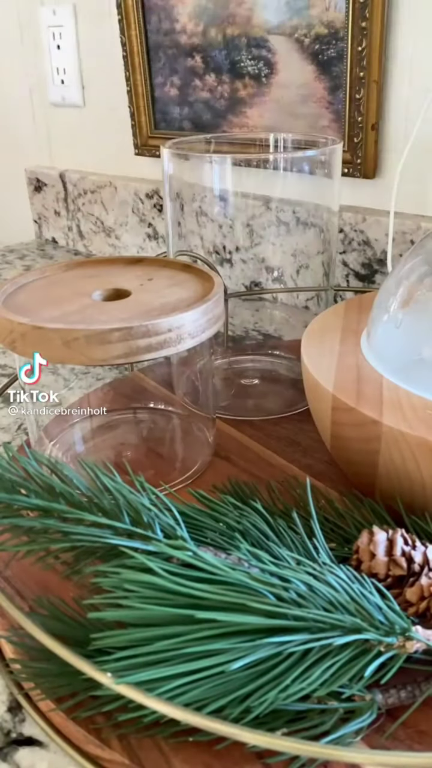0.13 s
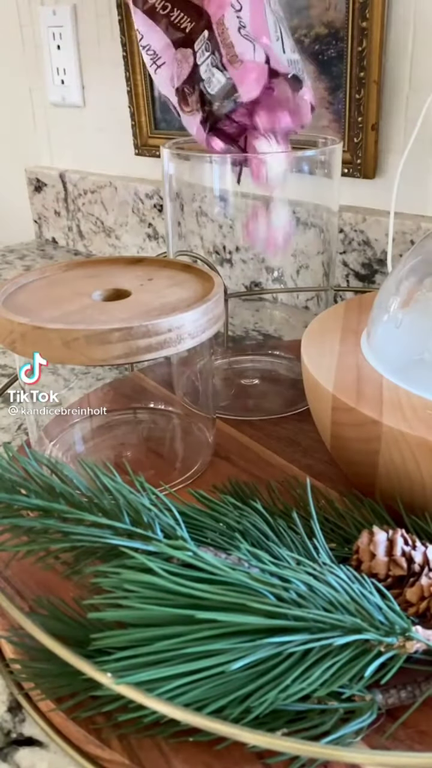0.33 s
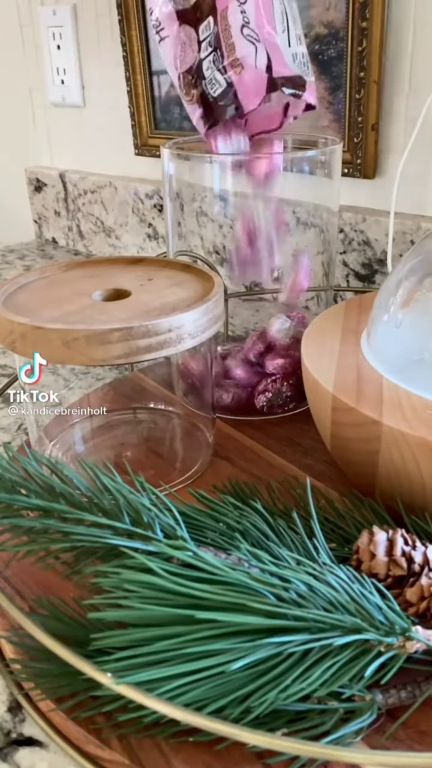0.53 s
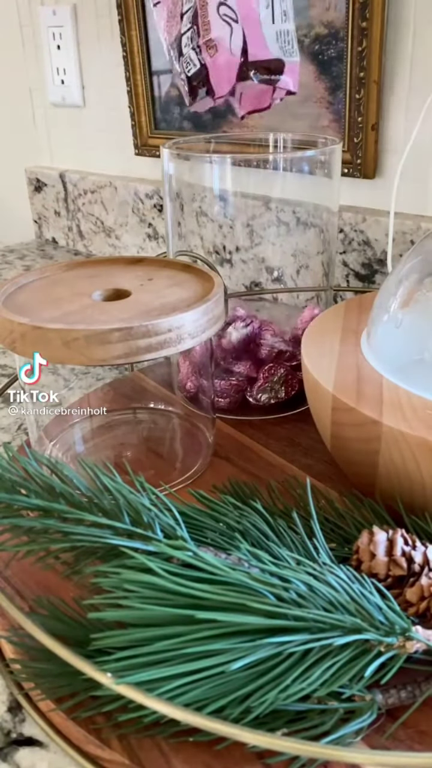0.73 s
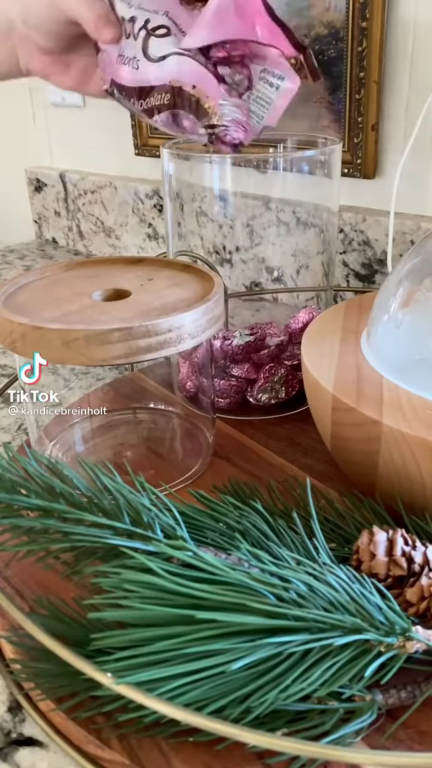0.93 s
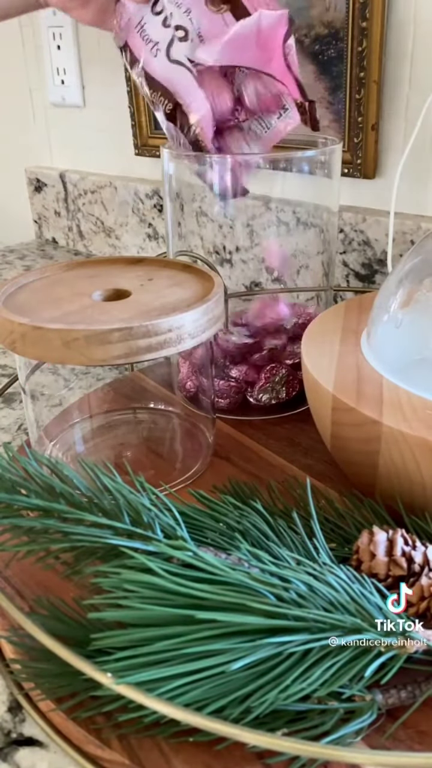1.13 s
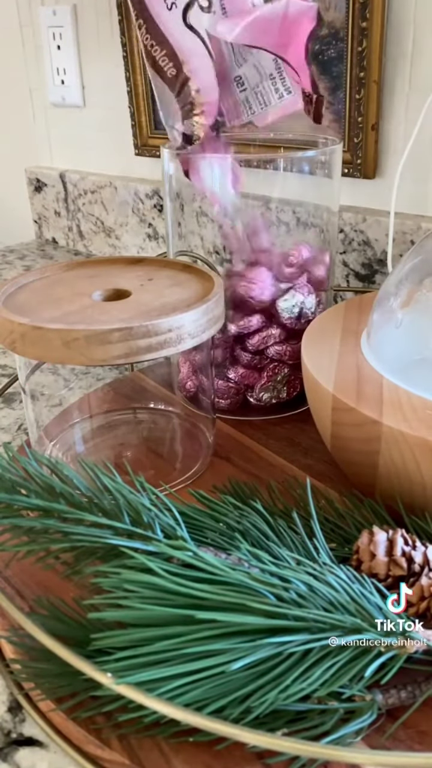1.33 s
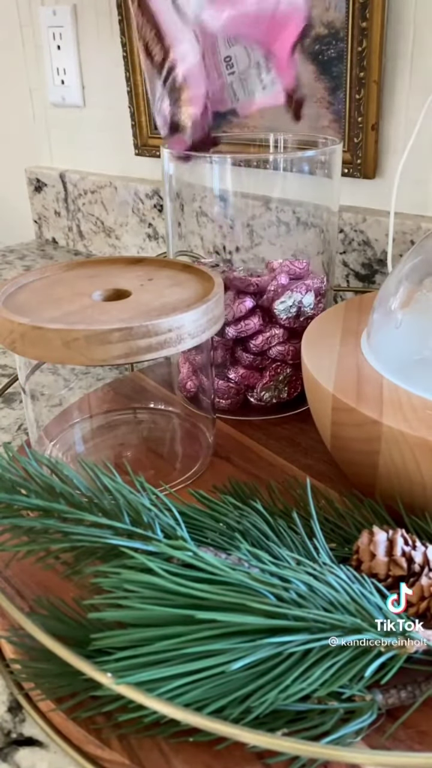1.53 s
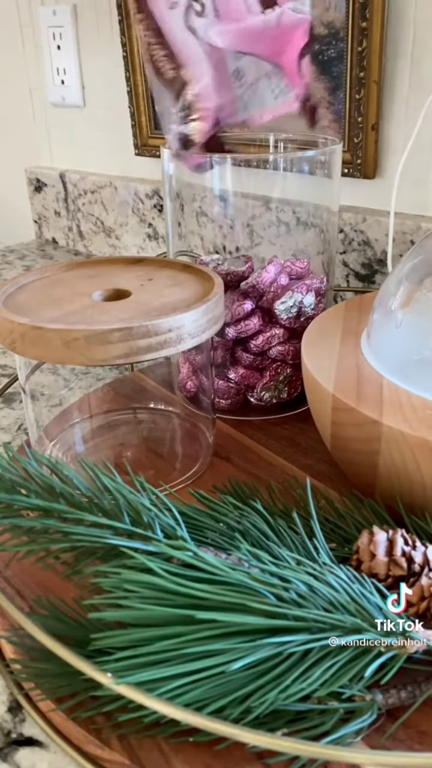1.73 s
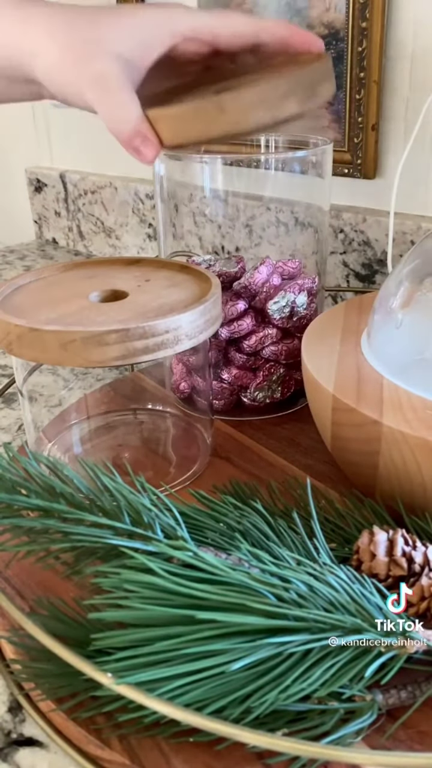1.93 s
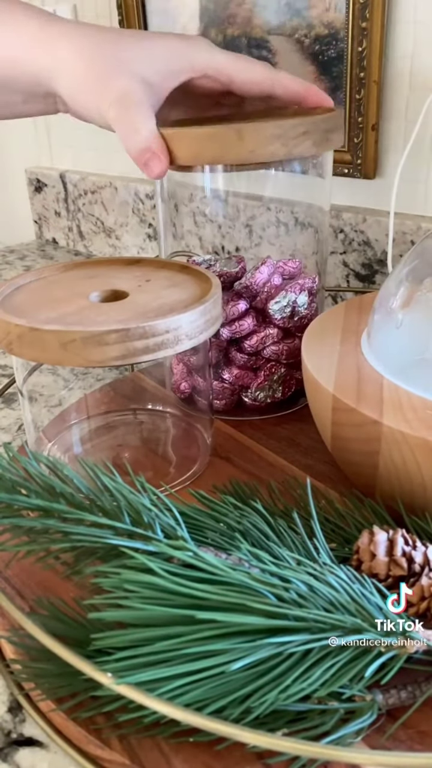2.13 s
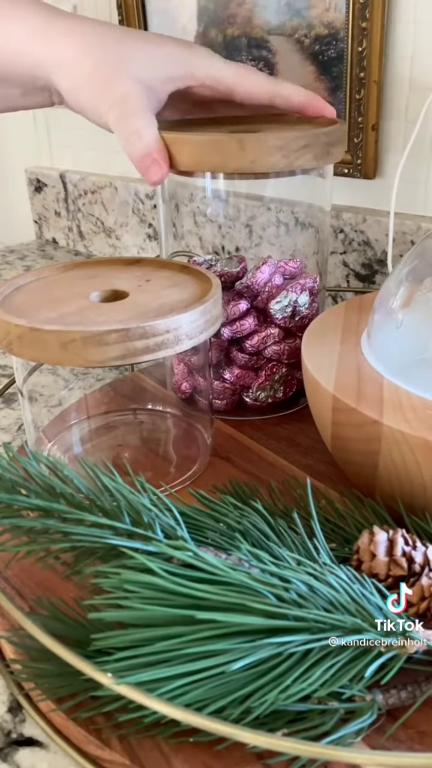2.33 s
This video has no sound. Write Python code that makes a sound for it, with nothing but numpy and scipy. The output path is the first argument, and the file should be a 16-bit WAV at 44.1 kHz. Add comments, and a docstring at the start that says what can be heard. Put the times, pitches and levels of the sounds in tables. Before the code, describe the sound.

Foil-wrapped chocolates pour from a crackling bag into a ringing glass jar, then a wooden lid knocks on

```python
"""Sweets poured into a glass jar

Foil-wrapped sweets are poured from a crackling bag into a thin glass jar in two shots, then a wooden lid is set on.
Each sweet that strikes the glass rings its modes and damps what was ringing; the heap rattles and thuds in the
jar's air. Grains of noise make the film, damped sines the lid; under all lies a quiet room with rumble and a
mains hum. The shots are joined by hard edits that cut the ringing glass."""
import sys
import numpy as np
from scipy import signal
from scipy.fft import rfft, irfft
from scipy.io import wavfile
from scipy.ndimage import uniform_filter1d

SR = 44100
rng = np.random.default_rng(int(sys.argv[2]) if len(sys.argv) > 2 else 0)


def makeup_ratio(level_db):
    """Linear amplitude ratio for a level in decibels (20 dB per factor of ten)."""
    decades = np.asarray(level_db, float) / 20
    return 10 ** decades


def file_out(sig):
    """Save sig as 16-bit WAV at sys.argv[1]."""
    # one column per channel
    cols = np.atleast_2d(sig).T
    # limit, then scale
    lim = np.clip(cols, -1, 1)
    pcm = np.round(lim * 32767).astype(np.int16)
    wavfile.write(sys.argv[1], SR, pcm)


N = 109544
T = np.arange(N) / SR

# the two shots of pouring: start/s, end/s
POURS = [(.135, .868), (.868, 1.755)]
# rattle of the tumbling heap: t/s, level/dB
TUMBLE = [(.27, -85), (.34, -28.5), (.55, -26), (.7, -34.5), (.77, -55), (1.12, -41.5), (1.25, -24.5),
          (1.35, -43.5), (1.42, -47.5), (1.6, -88)]


def read(points, hz):
    """Spectrum lookup on a log frequency axis."""
    f, value = np.transpose(points)
    return np.interp(np.log(hz + 1), np.log(f + 1), value)


def curve(table, column=1):
    """A column of a time table, per sample."""
    rows = np.array(table)
    return np.interp(T, rows[:, 0], rows[:, column])


def evened(x):
    """Scales to rms 1."""
    return x / np.sqrt(np.mean(x ** 2) + 1e-20)


def coloured(x, points):
    """Filters by a spectrum table."""
    gain = makeup_ratio(read(points, np.fft.rfftfreq(len(x), 1 / SR)))
    return irfft(rfft(x) * gain, len(x))


def band(x, lo_hz, hi_hz):
    """Band-pass."""
    sos = signal.butter(2, [lo_hz, min(hi_hz, SR / 2.1)], "band", fs=SR, output="sos")
    return signal.sosfilt(sos, x)


def clicks(per_s, spread_db):
    """Sparse clicks of random sign, a few large."""
    size = makeup_ratio(spread_db * np.minimum(rng.exponential(1, N), 4))
    sign = rng.choice([-1., 1.], N)
    return size * sign * (rng.random(N) < per_s / SR)


def burst(t60):
    """A short dying puff of noise."""
    t = np.arange(2000) / SR
    return rng.standard_normal(len(t)) * makeup_ratio(-60 * t / t60)


def add(mix, s, sound):
    """Mixes a sound in at a time."""
    part = mix[round(s * SR):][:len(sound)]
    part += sound[:len(part)]


def tumbling():
    """Gain of the tumbling heap, silent outside its table."""
    return makeup_ratio(curve(TUMBLE)) * (T > TUMBLE[0][0]) * (T < TUMBLE[-1][0])


def air():
    """Room rumble and hiss from coloured noise, with a slightly wavering mains hum."""
    # colour of the room noise: f/Hz, level/dB
    room_colour = [(15, -1.5), (44, -7.5), (86, -22), (121, -13.5), (153, -22.5), (735, -36.5),
                   (15500, -65)]
    room_db, hum_db, hum_hz = -37.5, -50.5, 120
    room = makeup_ratio(room_db) * evened(coloured(rng.standard_normal(N), room_colour))
    waver = 1 + 0.32 * evened(uniform_filter1d(rng.standard_normal(N), 3000))
    return room + makeup_ratio(hum_db) * waver * np.sin(2 * np.pi * hum_hz * T)


def bag():
    """Crackling film: clumped grains of varied colour over a hiss, and some distinct snaps."""
    # crackle of bag and foil: t/s, level/dB
    crackle = [(.135, -29), (.36, -23.5), (.55, -29.5), (.69, -31.5), (.77, -59), (.81, -42.5), (.97, -35),
               (1.08, -29.5), (1.27, -28.5), (1.4, -34.5), (1.6, -45.5), (1.64, -40), (1.755, -49.5)]
    # tone of the crackle, before a 3 dB per octave upward tilt: f/Hz, level/dB
    film_colour = [(88, -36), (150, -9.5), (500, 2), (1340, -7), (4500, -9.5), (15500, -15)]
    # single snaps of the film: t/s, level/dB, f/Hz
    snaps = [ (0.8086, -23.5, 3120), (0.9053, -21.5, 3550), (0.9687, -20.5, 3400), (1.478, -26, 4450),
             (1.51, -22.5, 7240), (1.539, -32.5, 2010), (1.575, -40, 2970), (1.637, -29, 10000),
             (1.643, -23, 2800), (1.652, -31.5, 4940), (1.6726, -37.5, 4010), (1.705, -24, 3400)]
    clumps = makeup_ratio(5 * evened(uniform_filter1d(rng.standard_normal(N), 500)))
    grains = np.zeros(N)
    for lo in (200, 600, 1800, 5400):
        puffs = signal.oaconvolve(clumps * clicks(700, 4.5), burst(.007))[:N]
        grains += band(puffs, lo, 3 * lo) / np.sqrt(lo)
    hiss = evened(coloured(rng.standard_normal(N), [(200, 0), (16000, -19)]))
    tilted = [(hz, db + 10 * np.log10(hz)) for hz, db in film_colour]
    film = evened(coloured(evened(grains) + .4 * hiss, tilted))
    out = film * makeup_ratio(curve(crackle)) * (T > POURS[0][0]) * (T < POURS[-1][1])
    for s, db, hz in snaps:
        puff = burst(0.02)
        pitched = 1.2 * band(puff, 0.86 * hz, 0.94 * hz)
        add(out, s, makeup_ratio(db) * (pitched + 1.34 * band(puff, 210, 12000)))
    return out


def heap():
    """Sweets knocking together: bright rattle, thuds that ring the jar's air, and dull bumps of the jar."""
    # air and body of the jar under thuds: f/Hz, width/Hz, level/dB
    jar_modes = [(270, 14, -7.5), (563, 22, 3.5), (813, 68, 6.5), (901, 11, 5)]
    # dull bumps of the jar: t/s, level/dB
    bumps = [(1.098, -30.5), (1.33, -25), (1.536, -28.5), (1.635, -29)]
    thud_db = -3  # against the rattle
    bump_hz, bump_t60 = 236, .08  # Hz, s
    t = np.arange(3000) / SR
    body = np.zeros(len(t))
    for hz, width, db in jar_modes:
        decay = np.exp(-np.pi * width * t)
        body += makeup_ratio(db) * decay * np.sin(2 * np.pi * hz * t) * np.sqrt(width)
    thuds = evened(signal.oaconvolve(clicks(400, 4), body)[:N])
    rattle = np.zeros(N)
    for lo in (1000, 1700, 2800, 4600):
        puffs = signal.oaconvolve(clicks(280, 5), burst(.013))[:N]
        rattle += band(puffs, lo, 1.7 * lo) / lo ** .3
    out = tumbling() * (makeup_ratio(thud_db) * thuds + evened(rattle))
    for s, db in bumps:
        add(out, s, makeup_ratio(db - 60 * t / bump_t60) * np.sin(2 * np.pi * bump_hz * t))
    return out


def glass():
    """Each mode gathers placed strikes and light patter, and loses energy by decay and by contact."""
    # sweets on the wall: t/s, then level/dB of its modes from 6 kHz up, at 1.2 kHz and at 3.2 kHz
    clinks = [(0.29, -12, -7, -17), (0.3268, -2, -10.5, -11), (0.3642, -1.5, -30, -24.5),
              (0.467, -9.5, -39, -13), (0.5262, -3, -19.5, -16), (0.573, -4.5, -38, -20),
              (0.6029, -35, -16.5, -19.5), (0.6352, -18.5, -59, -21.5), (0.6604, 1.5, -70.5, -24),
              (1.0045, -3, -25.5, -19.5), (1.1106, -22.5, -20.5, -30.5), (1.143, -13.5, -20, -17),
              (1.1632, -14, -12.5, -14), (1.2016, -9, -19.5, -21), (1.2444, -14.5, -19, -12.5),
              (1.2714, -5, -13, -15.5), (1.3051, -14.5, -20.5, -62), (1.3377, -14.5, -20.5, -16.5),
              (1.348, -3, -78, -20), (1.453, -36, -37.5, -27.5), (1.5404, -59, -33.5, -44)]
    # sweets on the still bare base: t/s, level/dB of its high modes, level/dB of its 2 kHz knock
    base_hits = [(.338, -29, -3.5), (.365, 15, -6), (0.381, -1.5, -12), (0.395, -3.5, -22.5),
                 (0.4088, 0.5, -20), (0.4186, -5.5, -4.5), (0.445, -13, -10.5), (0.458, 0.5, -31),
                 (0.468, 5, -12), (0.482, -3, -18), (0.5301, -12.5, -2)]
    # modes by group, three of the wall and two of the base: f/Hz
    mode_hz = [
        [6085, 6115, 7505, 7980, 9820, 11530, 14300],
        [1188, 1212],
        [3243, 3270],
        [4780, 4870, 7750],
        [2040],
    ]
    # the same modes: level/dB, t60/s
    mode_ring = [
        [(-0.5, 0.087), (-3, 0.072), (-6, 0.083), (-11, 0.052), (-16, 0.11), (-14.5, 0.035), (-28, 0.08)],
        [(-2, 0.35), (-8, 0.3)],
        [(-4.5, 1), (-14, 0.65)],
        [(-8.5, 0.039), (-6.5, 0.017), (-8.5, 0.018)],
        [(1, 0.0097)],
    ]
    # light touches, one entry per group: level/dB
    patter_db = [2.5, -6, -3.5, -21, -7.5]
    patter_per_s = 340
    strike_s, base_strike_s = 0.00054, .001  # rise of a ring; softer for the thick base's high modes
    contact_db, spread_db = 12.5, 3  # ring lost to each new contact; chance per mode
    touch_db_per_s, busy_db = 239, -17.5  # damping by tumbling sweets at this rattle level
    full_db_per_s = 167  # extra damping once the jar is half full
    crack_db, crack_t60 = -7.5, 0.022  # broadband crack under each strike: dB, s
    wall, base, out = np.array(clinks), np.array(base_hits), np.zeros(N)
    # touches of about unit size, following the heap
    patter = evened(clicks(patter_per_s, 2.0)) * tumbling() / np.sqrt(SR / patter_per_s)
    groups = [wall[:, [0, 1]], wall[:, [0, 2]], wall[:, [0, 3]], base[:, [0, 1]], base[:, [0, 2]]]
    for g, strikes in enumerate(groups):
        rise_s = base_strike_s if g == 3 else strike_s
        rise = np.hanning(max(round(2 * rise_s * SR), 4))
        at = (strikes[:, 0] * SR).astype(int)
        # loss per sample; tumbling damps only the wall's high modes
        grip_db = touch_db_per_s / SR * makeup_ratio(curve(TUMBLE) - busy_db) * (g == 0)
        grip_db += full_db_per_s / SR * (T > POURS[0][1])
        grip_db[at] = contact_db
        for k, (hz, (db, t60)) in enumerate(zip(mode_hz[g], mode_ring[g])):
            push = patter * makeup_ratio(patter_db[g]) * np.exp(2j * np.pi * rng.random(N))
            draw = rng.standard_normal((len(at), 2))
            strike_db = strikes[:, 1] + spread_db * draw[:, 0] * (k > 0)
            push[at] += makeup_ratio(strike_db) * np.exp(9j * draw[:, 1])  # scattered phase
            push = signal.oaconvolve(push, rise / rise.sum())[:N]
            for t0, t1 in POURS:  # ringing starts afresh in each shot
                cut = slice(round(t0 * SR), round(t1 * SR))
                lost = makeup_ratio(np.cumsum(grip_db[cut] + 60 / SR / max(t60, .01)))
                ring = np.cumsum(push[cut] * lost) / lost
                out[cut] += makeup_ratio(db) * (ring * np.exp(2j * np.pi * hz * T[cut])).real
    for s, *group_db in clinks + base_hits:
        add(out, s, makeup_ratio(max(group_db) + crack_db) * band(burst(crack_t60), 860, 10000))
    return out


def lid():
    """Wooden knocks: damped modes with a noisy edge for sharper blows; faint ticks and rubs between."""
    # lid on rim: t/s, level/dB, sharpness/dB
    knocks = [(1.9709, -22, -6.5), (2.1013, -32.5, 26.5), (2.147, -21, 20), (2.282, -43, -19.5)]
    # modes of the wood: f/Hz, level/dB
    wood_modes = [(560, 1), (625, -0.5), (920, -8.5), (1320, -5), (2085, -4)]
    # faint ticks of the lid: t/s, level/dB
    ticks = [(1.919, -44), (2.052, -39)]
    # the lid's seal slides on the glass: t/s, length/s, level/dB
    rubs = [(2.084, 0.11, -41), (2.293, 0.041, -51)]
    cycles = 38  # each mode falls 60 dB in so many cycles
    out, t = np.zeros(N), np.arange(6000) / SR
    for s, db, sharp_db in knocks:
        wood = np.zeros(len(t))
        for hz, mode_db in wood_modes:
            decay = makeup_ratio(mode_db + rng.normal(0, 4.6) - 60 * t * hz / cycles)
            wood += decay * np.sin(2 * np.pi * (hz * t + rng.random()))
        add(out, s, makeup_ratio(db) * wood * np.minimum(t / 0.001, 1))
        add(out, s, makeup_ratio(db + 21.5) * band(burst(0.024), 115, 392))  # dull weight of the blow
        add(out, s, makeup_ratio(db + sharp_db) * band(band(burst(0.023), 950, 4550), 530, 3550))
    for s, db in ticks:
        add(out, s, makeup_ratio(db) * band(burst(0.023), 2240, 7000))
    for s, length, db in rubs:
        size = round(length * SR)
        swell = np.hanning(size) ** .5
        add(out, s, makeup_ratio(db) * swell * band(rng.standard_normal(size), 3200, 17000))
    return out


def tail(x, t60):
    """Reverberant tail of energy 1: dying noise after a 3 ms gap."""
    t = np.arange(SR // 3) / SR
    taps = rng.standard_normal(len(t)) * makeup_ratio(-60 * t / t60) * (t > .003)
    return signal.oaconvolve(x, taps / np.linalg.norm(taps))[:N]


def scene():
    """All sources in a small room, the same in both channels."""
    room_t60, room_db = 0.073, -12.5  # s, dB
    near = glass() + heap() + bag()
    wet = makeup_ratio(room_db) * tail(near, room_t60) * (T < POURS[-1][1])  # cut where the pouring ends
    wood = lid()
    wood_wet = makeup_ratio(-3.5) * band(tail(wood, 0.2), 227, 1840)
    mid = near + wet + wood + wood_wet + air()
    return np.array([mid, mid])


def low_pass(x):
    """Removes everything above the highest recorded frequency."""
    return signal.sosfilt(signal.butter(12, 15670, fs=SR, output="sos"), x)


def record(dry):
    """Soft overload near full scale, then a band limit."""
    driven = np.tanh(dry * 1.15) / 1.15
    limited = signal.oaconvolve(driven, signal.firwin(255, 15600, fs=SR)[None], "same")
    return low_pass(limited)


dry = scene()
out = record(dry)
file_out(out)
```